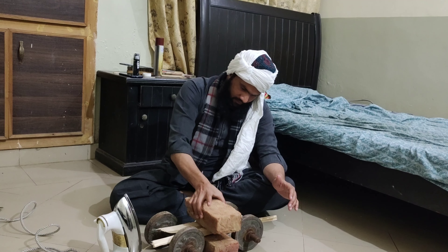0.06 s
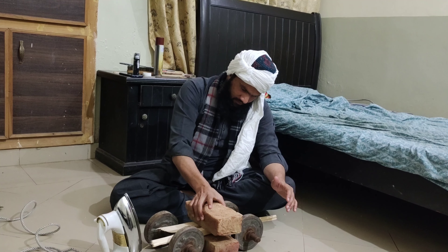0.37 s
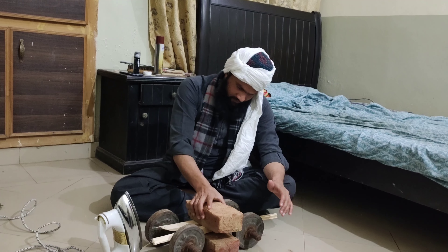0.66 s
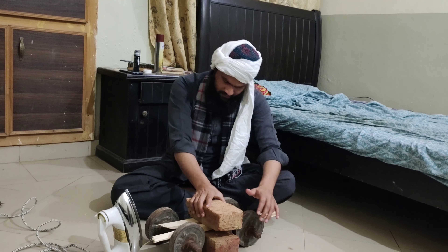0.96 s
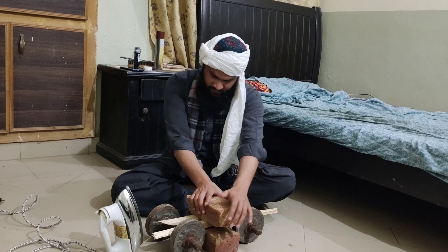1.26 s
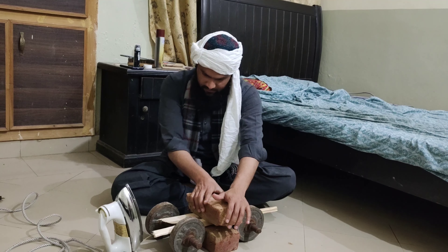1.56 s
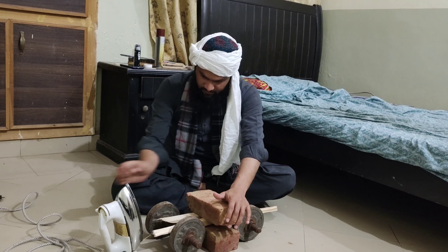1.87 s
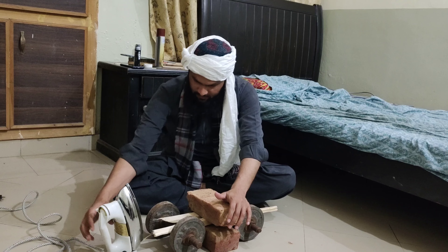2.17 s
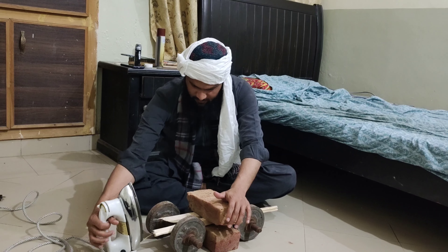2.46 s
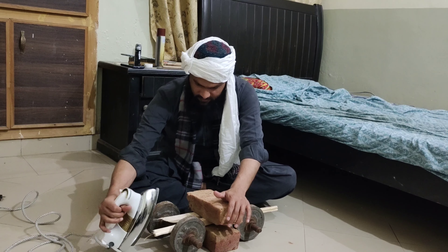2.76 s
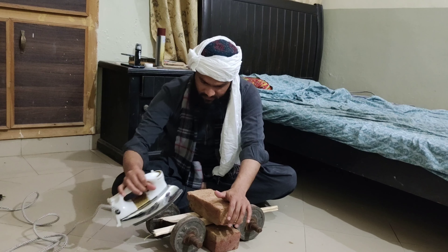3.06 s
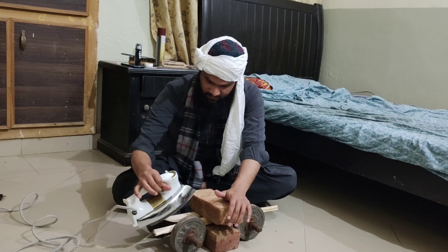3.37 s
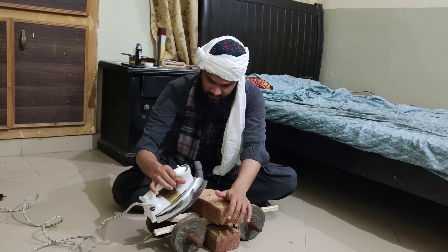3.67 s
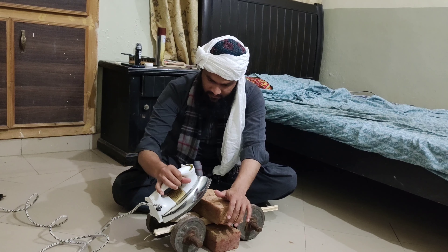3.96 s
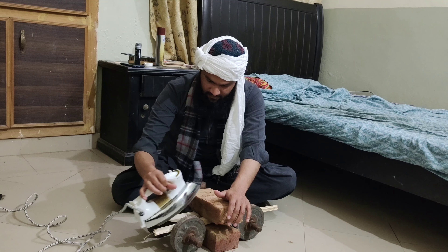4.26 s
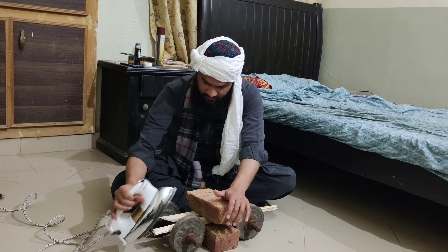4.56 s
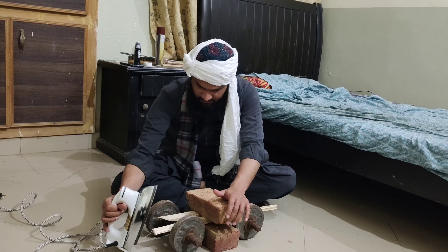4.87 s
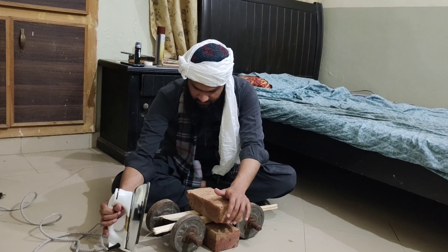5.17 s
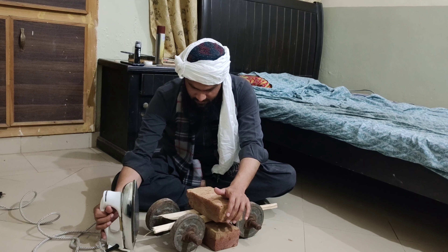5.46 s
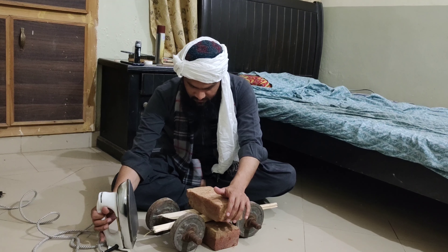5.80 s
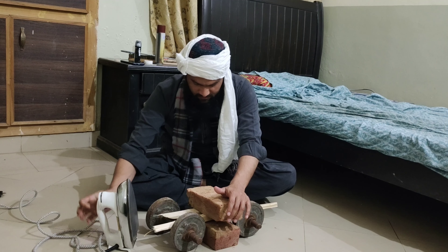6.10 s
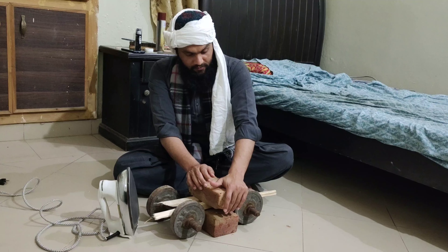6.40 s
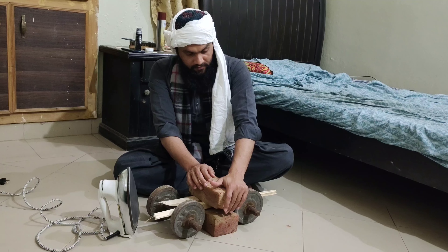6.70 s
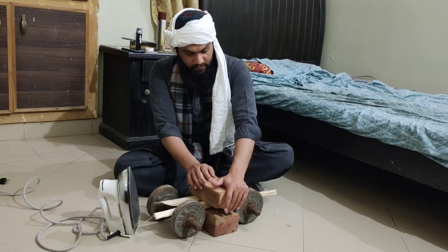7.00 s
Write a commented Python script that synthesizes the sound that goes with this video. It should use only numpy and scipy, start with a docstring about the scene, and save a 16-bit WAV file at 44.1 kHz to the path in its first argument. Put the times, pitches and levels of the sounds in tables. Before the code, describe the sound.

A brick bumps and grinds on a small wooden cart, then a clothes iron scrapes across tiles and is set down with a hard clank.

```python
"""A brick is shifted on a cart of thin sticks and iron weight plates in a quiet tiled bedroom.
Impacts excite the cart's modes, the loaded sticks tick and groan, and the plates roll a little.
A clothes iron is dragged off the floor, later set down hard on its heel, slid and let go:
friction rings its hollow body and hisses, and its plastic shell snaps. Hands and sleeves
brush past, and the room adds a short reverberation and a steady low murmur."""
import sys
import numpy as np
from scipy import signal
from scipy.fft import rfft, irfft
from scipy.io import wavfile

SR = 44100
rng = np.random.default_rng(int(sys.argv[2]) if len(sys.argv) > 2 else 0)


def int16_out(signal):
    """Quantize to a 16-bit WAV file."""
    q = np.round(np.clip(np.atleast_2d(signal).T, -1, 1) * 32767)
    wavfile.write(sys.argv[1], SR, q.astype(np.int16))


N = 310464
TIME = np.arange(N) / SR

# murmur of the room: (frequency [Hz], relative spectral density [dB])
AIR_SPECTRUM = [(18, -78), (30, -48), (75, -38), (102, -13), (131, -2), (173, -9), (213, -1.5),
                (330, -13.5), (353, -12.5), (628, -19.5), (829, -22.5), (1090, -25), (1440, -28),
                (5880, -36), (7400, -41), (9620, -99), (16300, -120)]
# reverberation of the room: (frequency [Hz], t60 [s])
ROOM_T60 = [(150, 0.42), (500, 0.32), (1000, .43), (2500, 0.3), (3900, 0.32), (6000, 0.27)]

# short narrow-band noises; the one at 5.2 s is a brief, soft, low rush just before the iron lands:
# (time [s], length [s], centre [Hz], level [dB])
SOFT_NOISES = [(0.015, 0.35, 1225, -71), (.868, 0.02, 1720, -50), (.887, 0.02, 2230, -47.5),
               (2.46, 0.13, 744, -60), (2.488, 0.0068, 1700, -58), (2.722, 0.039, 710, -46.5),
               (2.886, 0.092, 270, -55.5), (3.12, 0.27, 480, -69), (5.2, 0.048, 550, -53.5),
               (5.989, .018, 847, -35.5), (6.0, 0.087, 450, -57.5), (6.134, 0.017, 2070, -60.5),
               (6.263, 0.18, 1145, -67), (6.389, .11, 470, -62)]
# sleeves, skin and dust brushing past: (time [s], length [s], centre [Hz], level [dB])
SWISHES = [(2.04, .08, 1900, -64), (2.857, 0.027, 1920, -48), (3.03, 0.45, 3040, -81),
           (6.2, 0.25, 6000, -84.5)]

# iron striking the tiles: (time [s], ring level [dB], crack level [dB], contact cutoff [Hz])
IRON_KNOCKS = [(2.5364, -52, -42, 2520), (2.9855, -59.5, -56.5, 2600), (5.22, -23, -28, 3800),
               (5.2235, -36.5, -27.5, 3080), (5.2305, -41.5, -32.5, 3000), (5.280, -45.5, -41, 1550),
               (5.461, -44, -45, 1300), (5.991, -44.5, -49, 1160), (6.1335, -57.5, -62, 1000)]
# modes of the iron: (frequency [Hz], relative level [dB], t60 [s])
IRON_MODES = [(215, -13, .07), (345, -13, .08), (480, -8, .06), (625, 4, .085), (800, -4, .11),
              (858, -8, .1), (979, -3, .1), (1000, -20, .55), (1127, -8, .11), (1295, -10, .13),
              (1416, -12, .11), (1470, -14, .13), (1630, -9, .1), (1724, -10, .1), (1843, -8, .065),
              (2135, -1, .055), (3200, -12, .03), (3860, -14, .05)]
# contact noise of the iron: (frequency [Hz], relative level [dB])
IRON_CRACK = [(120, -14.5), (350, -2), (650, 2), (1000, -1.5), (1600, -2.5), (2200, -7), (2650, -14),
              (3300, -9.5), (3900, -7.5), (4700, -18.5), (7000, -22.5)]
# shell snapping as the grip loosens: (time [s], ring level [dB], crack level [dB], contact cutoff [Hz])
SHELL_SNAPS = [(5.9035, -54.5, -45, 6000), (5.9058, -36, -39, 11960)]
# modes of the iron's plastic shell: (frequency [Hz], relative level [dB], t60 [s])
SHELL_MODES = [(880, -16, 0.045), (1500, -16.5, 0.052), (2240, -9.5, 0.023), (3080, -1.5, .012),
               (3840, 1.5, 0.025), (5830, -13, .008)]
# contact noise of the shell: (frequency [Hz], relative level [dB])
SHELL_CRACK = [(650, -14), (1500, -16.5), (2800, -18), (3900, 7), (4800, -12.5), (6200, -5.5),
               (7500, -21.5)]
# heel of the iron dragged in two pulls: (time [s], speed [0-1])
DRAG_SPEED = [(2.535, 0.27), (2.565, 0.58), (2.592, 0.89), (2.645, 0.79), (2.68, 0.6), (2.735, 0.74),
              (2.895, 0.85), (2.945, 0.37), (3.04, 0)]
# body response of the dragged iron: (frequency [Hz], relative level [dB])
DRAG_BODY = [(180, -61), (300, -42), (404, -13.5), (516, 8.5), (606, 4), (671, 11), (825, 9.5), (976, -2.5),
             (1400, -6), (1820, -16), (3080, -120)]
# hiss of grit under the dragged heel: (frequency [Hz], relative level [dB])
DRAG_GRIT = [(710, -35), (1200, 0), (1350, -21), (1450, -3), (1660, 0.5), (1880, -1.5), (2310, 2),
             (2510, -8), (3250, 0.5), (4210, -1), (4760, -10.5), (6700, -5.5), (7400, -19), (9620, -56),
             (16300, -120)]
# pushes easing the iron into place: (time [s], hold [s], fade [s], added speed [0-1], weight gain [dB])
PUSHES = [(5.241, 0.044, 0.076, 0.49, 6), (5.344, 0.14, 0.079, 0.6, 0), (5.853, .11, 0.022, 0.11, 6),
          (5.966, 0.049, 0.025, 0.49, 5)]
# body response of the sliding iron: (frequency [Hz], relative level [dB])
SLIDE_BODY = [(350, -26), (550, -2.5), (680, -9.5), (800, 6), (900, -4.5), (1100, -14.5), (1600, -27)]
# hiss of grit under the sliding heel: (frequency [Hz], relative level [dB])
SLIDE_GRIT = [(820, -29), (1400, -5.5), (1510, -8.5), (1740, -12.5), (2070, -2.5), (2460, -15),
              (3790, -5.5), (5260, -21.5), (5720, -15), (7400, -54.5), (9620, -76), (16300, -120)]

# weight plates rolling on the tiles: (time [s], speed [0-1])
ROLL_SPEED = [(.43, 0.8), (.46, 0.88), (.58, 0.77), (.88, 1), (1.03, .88), (1.2, .84), (1.3, 0.6), (1.4, 0)]
# sticks ticking under the brick: (time [s], ring level [dB], crack level [dB])
STICK_TICKS = [(1.594, -66.5, -72.5), (1.630, -75, -73), (1.862, -81, -78), (2.0778, -49, -60),
               (2.086, -58, -71), (4.187, -60, -72), (4.717, -70.5, -74), (5.188, -72, -67.5)]
# modes of the sticks: (frequency [Hz], relative level [dB], t60 [s])
STICK_MODES = [(917, -4.5, 0.22), (2010, -4.5, 0.04), (2178, -2.5, 0.065), (3490, -5, 0.037),
               (4435, -12.5, .025), (6300, -3.5, 0.052)]
# contact noise of the sticks: (frequency [Hz], relative level [dB])
STICK_CRACK = [(500, -1.5), (900, 1.5), (2000, 1), (4800, -13), (6300, 10), (7500, -15)]
# soft bumps of the loaded cart: (peak time [s], frequency [Hz], peak level [dB])
BUMPS = [(.008, 232, -48), (0.4412, 700, -29.5), (.661, 358, -22), (.768, 230, -35), (.8916, 280, -21.5),
         (1.097, 670, -45), (1.226, 510, -43.5), (1.614, 114.4, -50.5), (1.657, 136.7, -49.5),
         (2.097, 253.6, -33), (3.315, 211, -55), (6.257, 217, -58.5), (7.006, 263, -47.5),
         (7.034, 269, -40.5)]
# shoves that grind the brick on the sticks: (time [s], level [dB])
SHOVES = [(.594, -39.5), (.65, -46), (0.766, -45), (.85, -54)]
# noise of crumbling brick: (frequency [Hz], relative level [dB])
GRIND_SPECTRUM = [(150, -7), (450, 11.5), (900, -6.5), (1400, 0.5), (1650, -5), (2050, -6.5), (2700, -10),
                  (3700, 0), (4700, -18.5), (6500, -18.5), (7400, -30.5)]
# brick striking the cart: (time [s], ring level [dB], crack level [dB], contact cutoff [Hz])
BRICK_KNOCKS = [(.1105, -74, -57.5, 2500), (.439, -55, -45, 905), (.4635, -36.5, -40, 726),
                (.6538, -30, -34, 2100), (.7575, -38.5, -39.5, 5640), (.8035, -55, -45.5, 5000),
                (.966, -80, -63.5, 12000), (1.224, -59, -69, 700)]
# modes of the brick on the cart: (frequency [Hz], relative level [dB], t60 [s])
BRICK_MODES = [(118.5, 1.5, 0.052), (208, -1, 0.11), (284, -2, 0.039), (400, 8.5, 0.061),
               (587, -20, 0.0083), (826, 5, 0.019), (1370, -24.5, 0.06), (2003, -7, 0.076),
               (3350, -2, 0.039)]
# contact noise of the brick: (frequency [Hz], relative level [dB])
BRICK_CRACK = [(150, -14.5), (400, 4), (800, 1.5), (1300, -10.5), (2000, -11), (2700, -21), (3500, -14.5),
               (4800, -20), (6500, -7.5), (7500, -27)]


def undb(db):
    """Amplitude ratio of a level in decibels."""
    return 10 ** (np.asarray(db) / 20)


def unit(x):
    """Normalisation to rms 1."""
    return x / np.sqrt(np.mean(x ** 2))


def bin_hz(length):
    """Frequencies of the Fourier bins, floored at 1 Hz."""
    return np.maximum(np.fft.rfftfreq(length, 1 / SR), 1)


def colour(x, spectrum):
    """Spectral shaping by (frequency [Hz], level [dB]) points, falling 30 dB per octave outside them."""
    hz, db = np.transpose(spectrum)
    f = bin_hz(len(x))
    octaves_outside = np.abs(np.log2(f / np.clip(f, hz[0], hz[-1])))
    gain = undb(np.interp(np.log(f), np.log(hz), db) - 30 * octaves_outside)
    return irfft(rfft(x) * gain, len(x))


def resonance(x, hz, width_hz):
    """Resonant filtering: one steep band, at rms 1."""
    f = bin_hz(len(x))
    detuning = (f - hz * hz / f) / width_hz
    return unit(irfft(rfft(x) / (1 + detuning ** 2), len(x)))


def add(out, start, x):
    """Superposition of x on out from a start time in seconds."""
    i = max(int(start * SR), 0)
    out[i:i + len(x)] += x[:N - i]


def stroke(start, rise, hold, fade):
    """Envelope of a hand movement: linear rise, then exponential decay from start + hold."""
    return np.clip((TIME - start) / rise, 0, 1) * np.exp(-np.maximum(TIME - start - hold, 0) / fade)


def swell(t, length):
    """Envelope of a soft contact: growth over length to a peak at t = 0, then damping."""
    u = np.maximum(t / length + 1, 0)
    return u ** 2 * np.exp(1 - u ** 2)


def speed_along(curve):
    """Piecewise linear speed, at rest outside the curve."""
    return np.maximum(np.interp(TIME, *np.transpose(curve), left=0, right=0), 0)


def grains(per_second, spread_db):
    """Friction as shot noise: tiny contacts of unequal size at random moments."""
    hit = rng.random(N) < per_second / SR
    return hit * rng.choice([-1, 1], N) * undb(spread_db * np.minimum(rng.standard_normal(N), 2))


def impacts(rows, modes, crack_spectrum, contact_s):
    """Modal ringing plus a crack of crushed grit at each blow; a soft contact low-passes both."""
    out, t = np.zeros(N), TIME[:SR // 2]
    attack = SR // 50  # levels are rms over the first 20 ms
    # neighbouring modes start in opposite directions
    ring = sum((-1) ** k * undb(db) * np.sin(2 * np.pi * hz * t) * np.exp(-np.log(1000) * t / t60)
               for k, (hz, db, t60) in enumerate(modes))
    for start, ring_db, crack_db, cutoff_hz in rows:
        contact = signal.butter(2, min(cutoff_hz, SR / 3), fs=SR, output="sos")
        crack = colour(rng.standard_normal(len(t)), crack_spectrum)
        crack *= np.exp(-t / contact_s) * (1 - np.exp(-10 * t / contact_s))
        for part, db in ((ring, ring_db), (crack, crack_db)):
            part = signal.sosfilt(contact, part)
            add(out, start, undb(db) * part / np.sqrt(np.mean(part[:attack] ** 2)))
    return out


def air(level_db):
    """Stationary coloured noise: the low murmur of the room."""
    return undb(level_db) * unit(colour(rng.standard_normal(N), AIR_SPECTRUM))


def room(x, wet_db, delay_s):
    """Diffuse reverberation from tiles, walls and furniture; the treble decays first."""
    t = TIME[:SR]
    hz, t60s = np.transpose(ROOM_T60)
    noise = rfft(rng.standard_normal(SR))
    shares = [np.interp(np.log(bin_hz(SR)), np.log(hz), row) for row in np.eye(len(hz))]
    tail = sum(irfft(noise * share) * np.exp(-np.log(1000) * t / t60) for share, t60 in zip(shares, t60s))
    tail *= np.clip(t / delay_s - .5, 0, 1)
    return x + undb(wet_db) * signal.fftconvolve(x, tail / np.linalg.norm(tail))[:N]


def noise_bursts(rows, width_hz):
    """Band-limited noise: each short burst fades in and out in one resonance."""
    out = np.zeros(N)
    for start, length, hz, db in rows:
        envelope = signal.windows.tukey(int(length * SR), .5)
        noise = resonance(rng.standard_normal(SR), hz, width_hz)
        add(out, start, undb(db) * envelope * noise[:len(envelope)])
    return out


def heel_friction(body_spectrum, grit_spectrum, top_hz, judder_db, judder_hz):
    """Stick-slip on dust rings the iron's hollow body and hisses up to top_hz; gives (body, hiss)."""
    knots = np.arange(int(N / SR * judder_hz) + 2)
    judder = undb(judder_db * np.interp(TIME * judder_hz, knots, rng.standard_normal(N)[:len(knots)]))
    contacts = grains(per_second=5000, spread_db=4) * judder
    grit = unit(colour(contacts, grit_spectrum))
    cutoffs = np.geomspace(2000, 12000, num=7)
    hiss = np.zeros(N)
    for cutoff, share in zip(cutoffs, np.eye(len(cutoffs))):  # crossfaded low-passes follow top_hz
        low_pass = signal.butter(4, cutoff, fs=SR, output="sos")
        hiss += signal.sosfiltfilt(low_pass, grit) * np.interp(top_hz, cutoffs, share)
    return unit(colour(contacts, body_spectrum)), hiss


def iron_drag(body_db, grit_db, top_hz, skid_speed):
    """Sliding friction: the hiss brightens with speed and grows louder until the heel skids freely."""
    speed = speed_along(DRAG_SPEED)
    body, hiss = heel_friction(DRAG_BODY, DRAG_GRIT, top_hz * speed, judder_db=1.8, judder_hz=90)
    bite = np.minimum(speed / skid_speed, 1)
    elapsed = np.clip(TIME - DRAG_SPEED[0][0], 0, 1)
    body *= undb(body_db - 16 * elapsed)  # the hand takes the weight
    hiss *= undb(grit_db + 3.5 * elapsed)  # the iron tips onto its edge
    return body * bite ** 0.68 + hiss * bite ** 3.1


def iron_slide(body_db, grit_db, top_hz, rise_s):
    """Slow friction: the creeping iron mostly hums in its body, and each push adds hiss."""
    speed = 0.19 * stroke(5.24, rise_s, hold=0.92, fade=0.14)  # creep between the pushes
    weight_db = 0
    for start, hold, fade, push_speed, db in PUSHES:
        push = stroke(start, rise_s, hold, fade)
        speed += push_speed * push
        weight_db += db * push
    body, hiss = heel_friction(SLIDE_BODY, SLIDE_GRIT, top_hz * speed ** 0.35, judder_db=1.2, judder_hz=50)
    return undb(weight_db) * (undb(body_db) * body * speed + undb(grit_db) * hiss * speed ** 2.4)


def iron_knocks():
    """Impact excitation: the iron strikes the tiles, and its shell snaps as the grip loosens."""
    knocks = impacts(IRON_KNOCKS, IRON_MODES, IRON_CRACK, contact_s=0.0067)
    return knocks + impacts(SHELL_SNAPS, SHELL_MODES, SHELL_CRACK, contact_s=0.0018)


def plate_roll(rumble_hz, width_hz, rumble_db, rim_db):
    """Rolling noise: rough rims rumble, lower as the cart slows, and grit drives a high resonance."""
    speed = speed_along(ROLL_SPEED)
    low_pass = signal.butter(2, width_hz / 2, fs=SR, output="sos")
    roughness = signal.sosfilt(low_pass, rng.standard_normal(N) + 1j * rng.standard_normal(N))
    phase = 2 * np.pi * np.cumsum(rumble_hz * speed) / SR
    rumble = unit(np.real(roughness * np.exp(1j * phase)))
    rim = resonance(grains(per_second=1900, spread_db=1), hz=3310, width_hz=410)
    return undb(rumble_db) * rumble * speed ** 1.77 + undb(rim_db) * rim * speed ** 8.1


def stick_ticks(cutoff_hz):
    """Impulse response: the thin sticks tick and ring under the load."""
    return impacts([(*tick, cutoff_hz) for tick in STICK_TICKS], STICK_MODES, STICK_CRACK, contact_s=0.0022)


def stick_groan(peak_s, hz, level_db, count, gap_s, loss_db, swell_s, stretch):
    """Stick-slip: one resonance of a loaded stick is fed by slips, each weaker and longer."""
    t = TIME - peak_s
    slips = sum(undb(-k * loss_db) * swell(t - k * gap_s, swell_s * stretch ** k) for k in range(count))
    return undb(level_db) * slips * np.sin(2 * np.pi * hz * t)


def cart_bumps(thump_hz, thump_db):
    """Forced vibration: a slow push swells one cart resonance over a thump, and the hand damps it."""
    out = np.zeros(N)
    for peak_s, hz, db in BUMPS:
        near = np.abs(TIME - peak_s) < .1
        t = TIME[near] - peak_s
        cycles = 2.3 * undb(0.4 * (-26.5 - db))  # weaker bumps swell for more cycles
        tone = swell(t, cycles / hz) * np.sin(2 * np.pi * hz * t)
        thump = undb(thump_db) * swell(t, length=0.015) * np.sin(2 * np.pi * thump_hz * t)
        out[near] += undb(db) * (tone + thump)
    return out


def brick_grind():
    """Abrasion: crumbs break from the brick at each shove."""
    force = sum(undb(db) * stroke(start, rise=0.0045, hold=0.0088, fade=0.024) for start, db in SHOVES)
    return unit(colour(grains(per_second=1800, spread_db=0.5), GRIND_SPECTRUM)) * force


def brick_knocks():
    """Damped free vibration: the brick strikes the cart and sets its modes ringing."""
    return impacts(BRICK_KNOCKS, BRICK_MODES, BRICK_CRACK, contact_s=0.0068)


def scene():
    """Superposition of cart, iron, soft noises, their reverberation and the room air, in mono."""
    cart = brick_knocks() + stick_ticks(cutoff_hz=5500) + brick_grind()
    cart += plate_roll(rumble_hz=800, width_hz=314, rumble_db=-54.5, rim_db=-57)
    iron = iron_knocks()
    iron += iron_drag(body_db=-43.5, grit_db=-46.5, top_hz=7550, skid_speed=0.8)
    iron += iron_slide(body_db=-49.5, grit_db=-51.0, top_hz=5800, rise_s=0.043)
    bursts = noise_bursts(SOFT_NOISES, width_hz=128) + noise_bursts(SWISHES, width_hz=1800)
    bumps = cart_bumps(thump_hz=145.4, thump_db=-12)
    groan = stick_groan(peak_s=0.479, hz=431, level_db=-21, count=4,
                        gap_s=0.026, loss_db=7, swell_s=0.0046, stretch=1.77)
    sound = room(cart + bursts, wet_db=-7.5, delay_s=0.0061)
    sound += room(bumps + groan, wet_db=-12.5, delay_s=0.0042)
    sound += room(iron, wet_db=-12.0, delay_s=0.015)
    return (sound + air(level_db=-67.13))[None]


def record(dry):
    """Band limiting: the deep bass is turned far down and the top is cut."""
    bass_cut = signal.butter(6, 92, "high", fs=SR, output="sos")
    top_cut = signal.ellip(10, .2, 70, 7150, fs=SR, output="sos")
    return signal.sosfilt(top_cut, signal.sosfilt(bass_cut, dry) + undb(-30.5) * dry)


dry = scene()
out = record(dry)
int16_out(out)
```